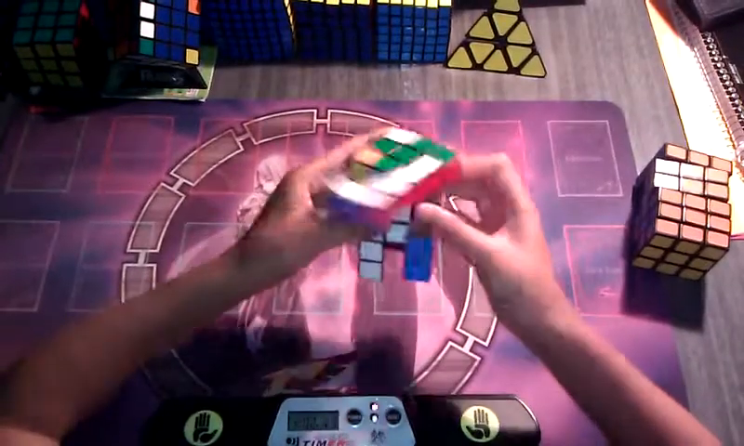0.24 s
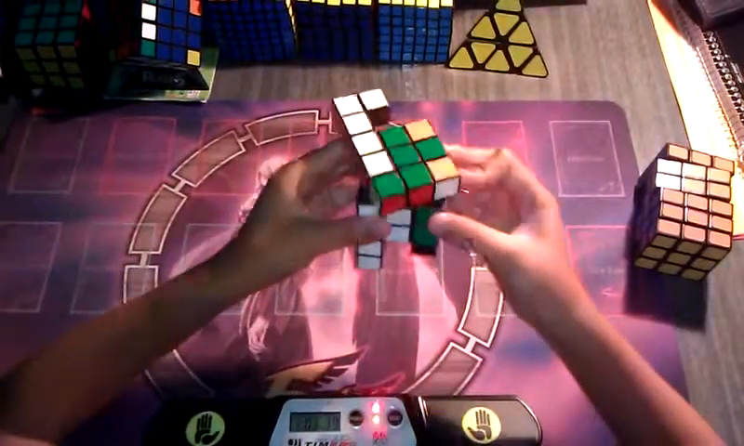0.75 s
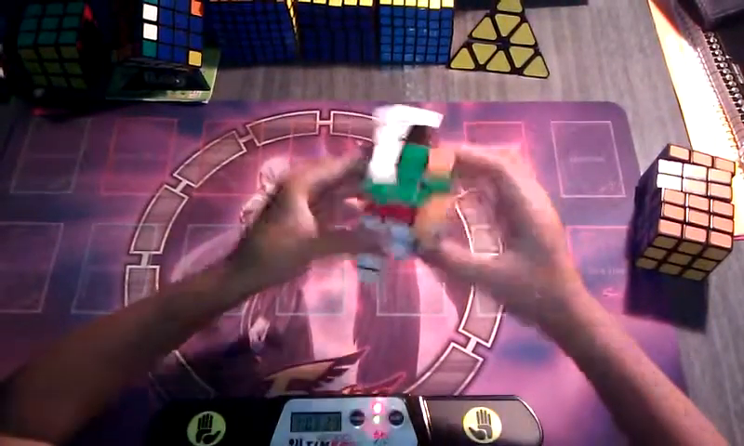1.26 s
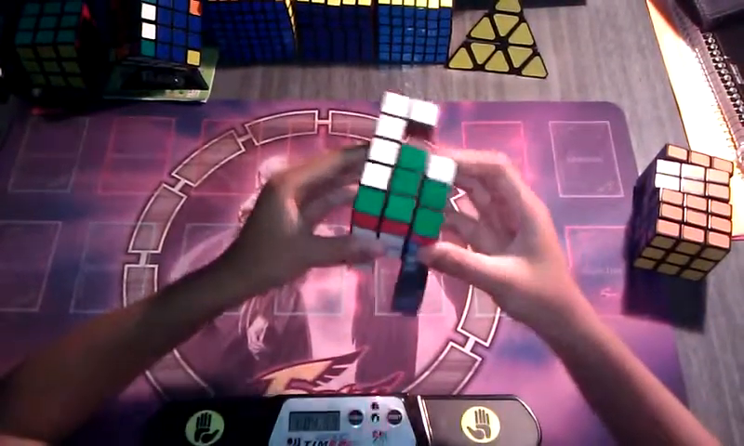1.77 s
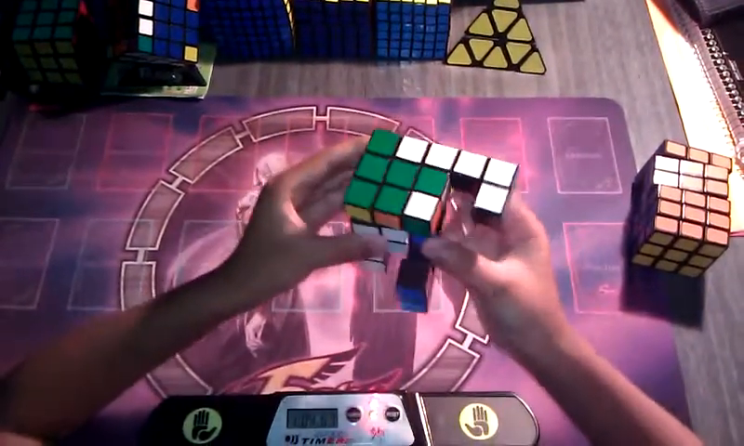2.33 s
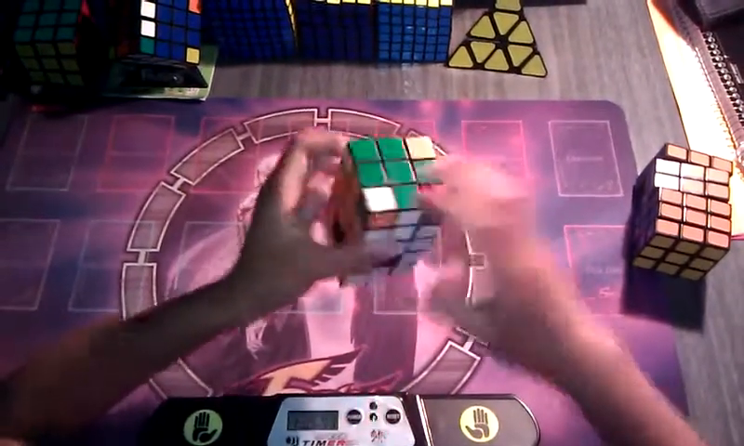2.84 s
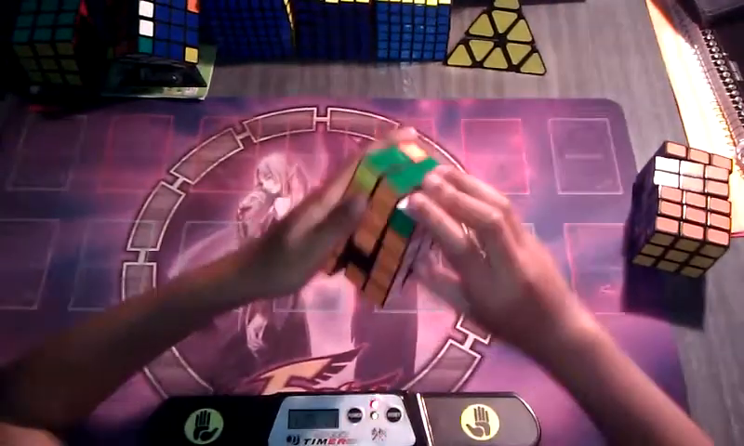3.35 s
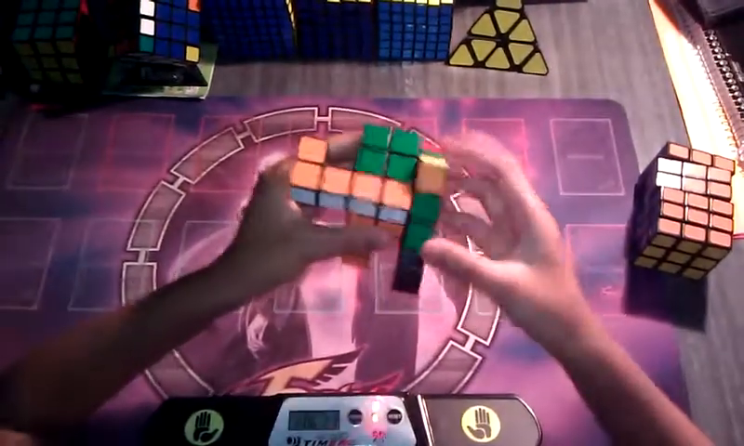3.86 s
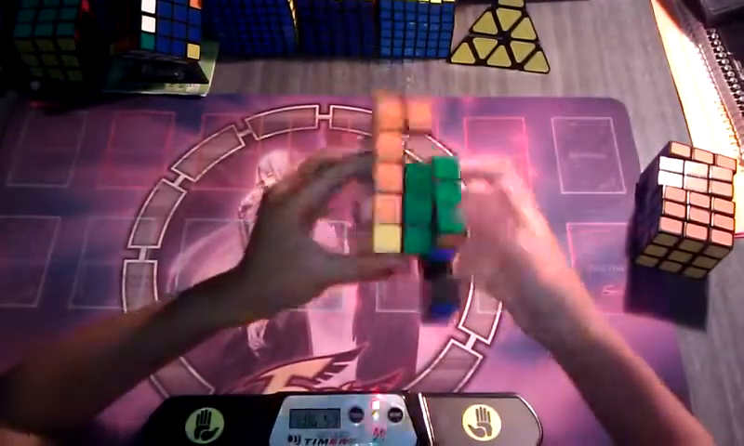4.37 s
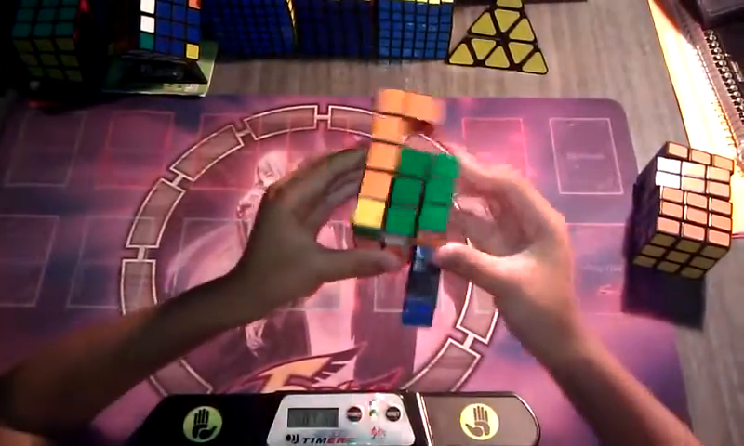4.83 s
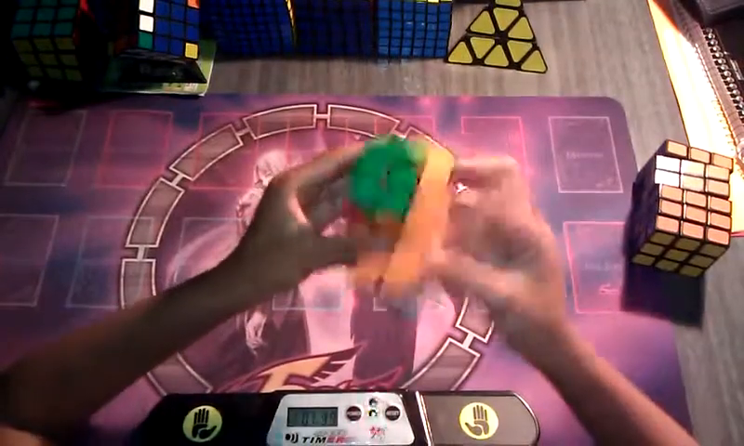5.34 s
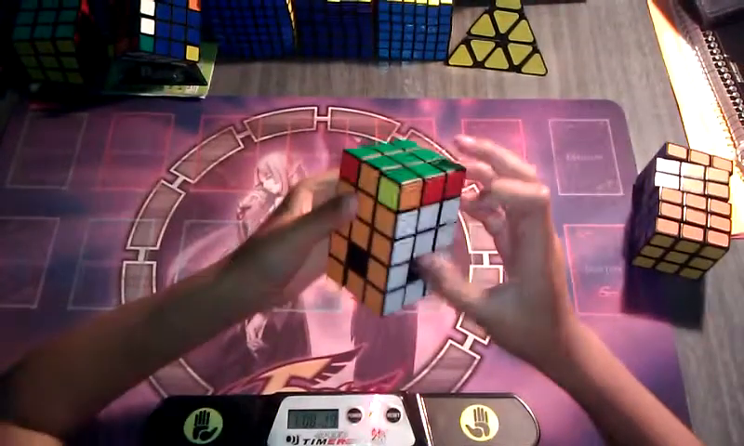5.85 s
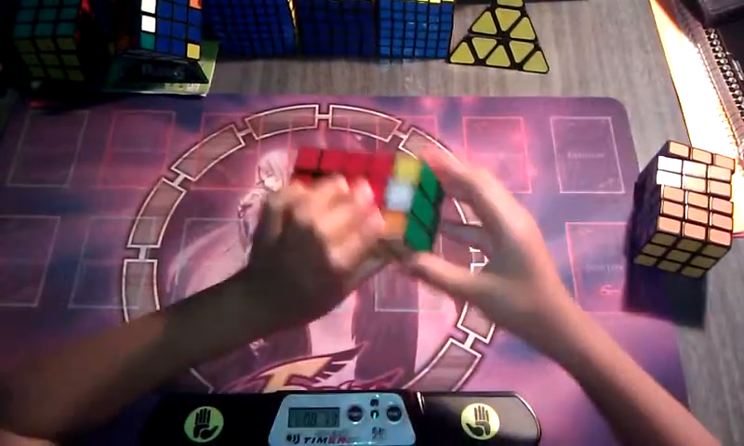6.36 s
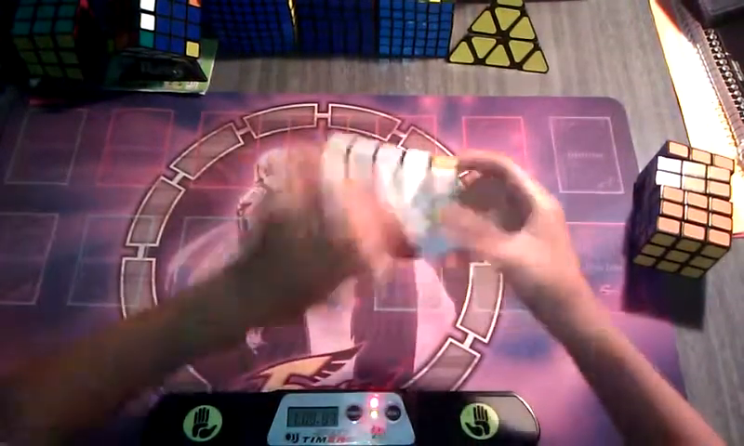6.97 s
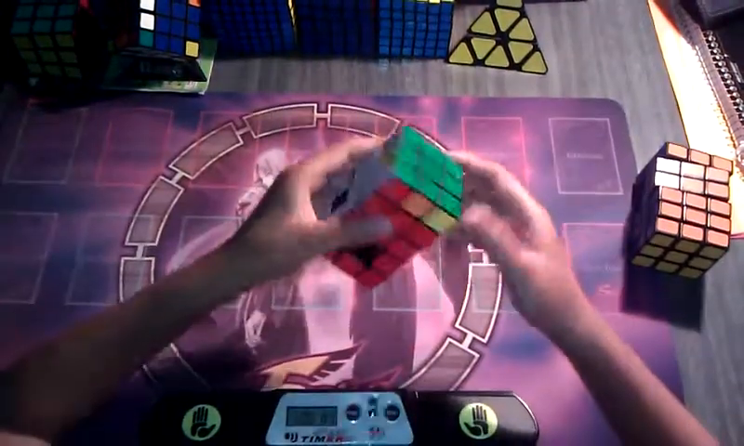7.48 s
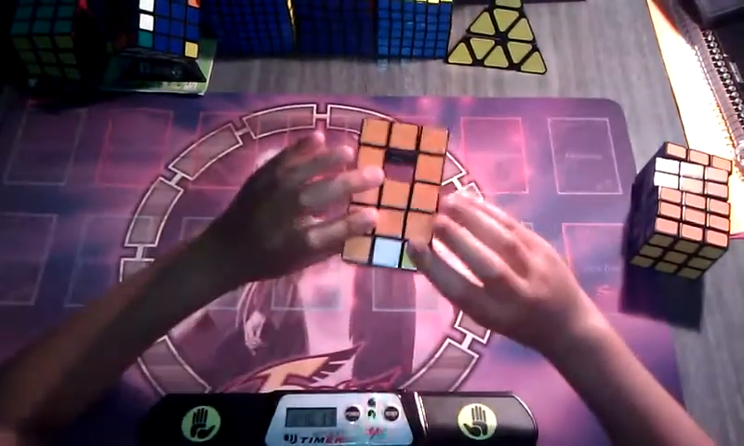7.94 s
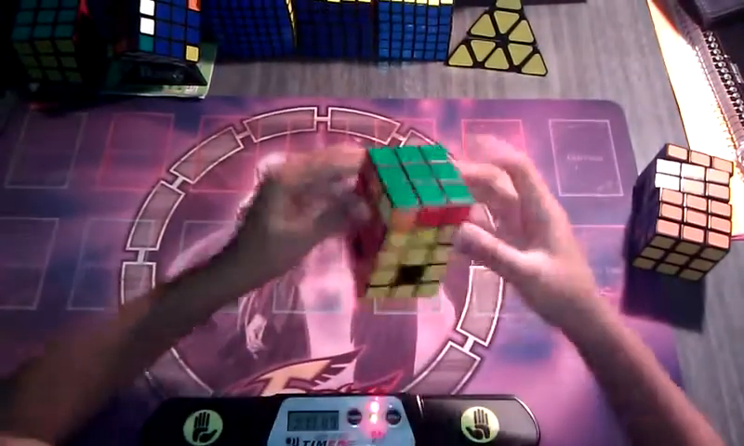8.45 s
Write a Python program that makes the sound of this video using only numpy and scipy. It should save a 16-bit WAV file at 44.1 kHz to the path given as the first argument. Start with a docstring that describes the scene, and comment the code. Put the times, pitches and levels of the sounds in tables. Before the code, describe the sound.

In a small quiet room with a faint, even rush of air, a hollow plastic twisty puzzle is worked by hand close to a narrow-band microphone. A dense flurry of bright clacks and rattling turns opens immediately and lasts to about 0.4 s. Lighter clicks follow, with a firm burst at 1.25-1.4 s, then faint grip ticks. Sharp snaps come at 2.2 and 2.5 s, a knock at 3.3, and a very hard double clack near 3.6. More quick turns fall around 4.2-4.3, 4.9 and 5.25-5.4 s, the hardest crackling with overload. Then it is nearly quiet, with only tiny ticks, until one rattling burst at 6.9-7.0 s. A very faint, brief low hum swells near 7.5 s, and sparse light knocks, slightly clearer at 8.15 and 8.5, continue to the end at about 8.7 s. Short room reflections surround the clacks.

```python
"""A plastic twisty puzzle is turned fast by hand over a desk, in a small quiet room.
Bursts of clacks and rattling turns open at once and return until about 5.5 s, with faint grip ticks between.
Then it thins out: one more burst near 6.9 s, a brief faint hum near 7.5 s, light knocks to the end.
Knocks are shaped noise plus shell modes; turns are cascades of ringing ticks over a rub.
The narrow-band microphone is close, and the hardest turns overload it into crackle."""
import sys
import numpy as np
from scipy import signal
from scipy.fft import rfft, irfft
from scipy.io import wavfile
from scipy.ndimage import uniform_filter1d

SR = 44100
rng = np.random.default_rng(int(sys.argv[2]) if len(sys.argv) > 2 else 0)


def wav_out(sig):
    """Save sig, one row per channel (or a flat mono array), as 16-bit PCM at SR to the path in sys.argv[1]."""
    wavfile.write(sys.argv[1], SR, np.round(np.clip(np.atleast_2d(sig).T, -1, 1) * 32767).astype(np.int16))


N = 384111

# steady room noise spectrum: (frequency [Hz], relative density [dB per Hz])
AIR_SPECTRUM = [(25, -43.5), (60, -32), (130, -22.5), (190, -11.5), (245, -6.5), (340, -3), (480, -5.5),
                (800, -9), (1300, -12), (4000, -17), (5600, -24.5), (7600, -18), (8600, -27.5),
                (9400, -68.5)]
AIR_RMS_DB = -59
# decay of the diffuse room tail: (frequency [Hz], t60 [s])
ROOM_DECAY = [(800, 0.2761), (3500, 0.23), (7500, 0.1841)]
# starting colour of that tail: (frequency [Hz], relative level [dB])
ROOM_TONE = [(500, 1), (1200, 1), (3500, 1), (6500, -0.91)]
# early echoes from near surfaces: (delay [s], level [dB])
NEAR_ECHOES = [(.0023, -7.5), (.0047, -9), (.011, -17), (0.0392, -46)]
# microphone response after its overloaded input: (frequency [Hz], gain [dB])
MIC_RESPONSE = [(20, -3), (100, -1.5), (700, -1), (8200, -2.5), (15500, -1.5)]
BAND_HZ, EDGE_HZ = 8800, 16000  # band limit before the crackle joins, and the final one
# lasting modes of the whole puzzle: (frequency [Hz], level [dB], t60 [s])
BODY_MODES = [(985, -54, 0.23), (1080, -55, 0.041), (1830, -68, 0.017), (2640, -60.5, 0.012)]
# fingers shift their grip and loose pieces tick: (start [s], end [s], relative level [dB])
GRIP_CHANGES = [(.4, .56, -45), (.74, 1.2, -43), (1.5, 2.05, -43.5), (2.25, 2.4, -43), (3.1, 3.25, -47),
                (4.45, 4.85, -40), (5.03, 5.14, -43), (5.93, 6.08, -52), (6.55, 6.66, -42),
                (6.74, 6.87, -47), (7.05, 7.3, -49), (8.4, 8.7, -49)]
GRIP_SPREAD_DB, GRIP_DB_PER_OCTAVE = 3.5, -3
# colour of the knocks and turns, including the recorder's band limit:
# (frequency [Hz], relative level [dB])
CONTACT_TONE = [(100, -43.5), (400, -21), (650, -17.5), (950, -4), (1600, 1), (2500, 0.5), (3500, -2.5),
                (5600, -2), (6600, 6.5), (7700, 3.5), (8300, -7), (8800, -23), (9500, -49), (11000, -57)]
# a layer slides or is flicked round:
# (start [s], length [s], relative level [dB], brightness [dB per octave])
LAYER_TURNS = [ (0.053, 0.0092, -28, -1.5), (0.096, 0.06, -13.5, 0.5), (0.248, 0.11, -23, -1),
               (0.587, 0.079, -44, -4.5), (0.696, 0.011, -29.5, -2.5), (0.881, 0.052, -38.5, -4),
               (1.094, 0.028, -40.5, -4), (1.2, 0.09, -28.5, -1.5), (1.339, 0.051, -16.5, -1.5),
               (1.674, 0.017, -42.5, -4.5), (2.051, 0.045, -35.5, -5), (2.182, 0.023, -16, 0),
               (2.51, 0.035, -14.5, 2), (2.588, .07, -31.5, 1.5), (3.262, .06, -41.5, -3),
               (3.43, 0.12, -29.5, -3), (3.607, 0.055, -8.5, 1.5), (4.088, 0.053, -39, -2.5),
               (4.167, 0.035, -17.5, 0), (4.286, 0.036, -23.5, 0), (4.462, 0.062, -46.5, -1.5),
               (4.737, 0.11, -45, -3.5), (4.857, 0.031, -20, -1.5), (5.202, 0.0072, -43.5, -4.5),
               (5.253, 0.046, -14, 3), (6.57, 0.072, -44.5, -2.5), (6.883, 0.11, -23, 0.5),
               (7.253, 0.02, -44.5, -2), (7.672, 0.015, -51, -3), (8.289, 0.015, -36.5, -1.5)]
# every turn: a soft lead-in that grows, the clatter at full speed, then a quick run-out
LEAD_S, LEAD_DB, LEAD_GROWTH_DB_PER_S = 0.021, -12.5, 253.5
SAG_DB, RUN_OUT_S, RUN_OUT_DB_PER_S = -2, 0.035, 800.5
# knocks that stand out, one piece on another:
# (time [s], relative level [dB], brightness [dB per octave])
PIECE_KNOCKS = [ (.0353, -31, -1.5), (.061, -8.5, -1), (.0665, -19, -2), (.0926, -16, 7.5), (.1025, -7, 2),
                (.1167, -1, 7.5), (.1445, -7, -2.5), (.199, -20, 0.5), (.251, -11, 4), (.286, -12, 2.5),
                (.3234, -15, 10), (.3443, -10, 0), (.3927, -27, -2.5), (.4729, -34, -4), (.5924, -23.5, 4),
                (.6001, -21.5, -4.5), (.6331, -25.5, -6), (.6512, -21, -4.5), (.681, -34, 1),
                (.703, -14.5, 3), (.716, -17.5, 5), (.8198, -25, 1), (.8861, -23, 3.5),
                (.9227, -16.5, -1.5), (1.0846, -28, 1.5), (1.1217, -17, -1.5), (1.2119, -32, -7),
                (1.2528, -7, 1), (1.2745, -18, 3), (1.3318, -6.5, -2), (1.3451, -10.5, 3), (1.368, -3.5, 4),
                (1.3787, -10.5, 2), (1.4675, -26.5, -2.5), (1.617, -36.5, -3), (1.6508, -33, -2),
                (1.6962, -28.5, -3.5), (1.782, -35, -2.5), (1.837, -35, 4), (1.896, -31, -4.5),
                (1.9138, -26.5, 1), (1.992, -36.5, 3.5), (2.0757, -14.5, -1), (2.1035, -22.5, -1.5),
                (2.1646, -14.5, 5), (2.2148, -6.5, -0.5), (2.3222, -31, 0), (2.3834, -26.5, -1),
                (2.4731, -22.5, 0), (2.4997, -14.5, -0.5), (2.5194, -11, 0.5), (2.5365, 6, 1.5),
                (2.5908, -10.5, 0.5), (2.6186, -10.5, -3.5), (2.6497, -20, 0), (3.0283, -22, 5),
                (3.1163, -39.5, 1), (3.1546, -35.5, -1), (3.2256, -30, 1), (3.2734, -28.5, -3.5),
                (3.2926, -21.5, 0), (3.3271, -1.5, 2.5), (3.4512, -17, 1.5), (3.4818, -13.5, 1),
                (3.5157, -19.5, -3), (3.6108, -2.5, -13), (3.6182, 2.5, 5.5), (3.6429, 6.5, 6.5),
                (3.7512, -27, 4), (4.0536, -29.5, 2), (4.0718, -27, 0), (4.1029, -25, -3),
                (4.1565, -25.5, -4.5), (4.1753, -8.5, -4), (4.2047, -4.5, 6.5), (4.2925, -2, 0.5),
                (4.3244, -13.5, -2), (4.4826, -29.5, -4), (4.5795, -29, 4.5), (4.6139, -28.5, 3.5),
                (4.7599, -31, -8), (4.7901, -22.5, 0), (4.8579, -18.5, -3), (4.8735, 1.5, 3),
                (4.9114, -7.5, 2), (4.9926, -20.5, 10), (5.0366, -33, 2.5), (5.1064, -38.5, -5),
                (5.1335, -40, -5.5), (5.2015, -23, -0.5), (5.239, -9, 1.5), (5.2702, 5.5, 3.5),
                (5.2924, 0, -0.5), (5.3089, -4.5, 0.5), (5.3472, -20, 0), (5.3909, -6, 1.5),
                (5.4594, -22.5, 2.5), (5.756, -42, -2.5), (5.9717, -42, -5), (6.02, -44, -5),
                (6.3868, -33.5, 2), (6.5979, -27, 0), (6.628, -35.5, 8), (6.8358, -34.5, -3),
                (6.8958, -5.5, 0), (6.9167, -13, -0.5), (6.9292, -9.5, 3.5), (6.9706, -10, 2),
                (6.9848, -17, 0.5), (7.0549, -22.5, -3), (7.2488, -39.5, -5), (7.44, -43, -1.5),
                (7.566, -35, -5), (7.6746, -36, 0), (7.6905, -36.5, -3.5), (7.7595, -39.5, -12.5),
                (7.796, -36, -4.5), (8.0783, -34, -1.5), (8.1479, -21.5, -1), (8.2963, -33.5, 4),
                (8.3097, -33, -2), (8.4336, -37.5, -6), (8.4808, -20, 1), (8.6372, -28.5, -1.5),
                (8.646, -33, -3), (8.7004, -28, -1.5)]
# short modes of a hollow piece, before each piece's own variation:
# (frequency [Hz], relative level [dB])
SHELL_MODES = [(1180, -10.5), (1700, -2.5), (2380, 2), (2900, -6), (3850, -4), (4700, 2), (6200, -1.5),
               (6950, -1.5), (7550, 2.5)]
# a piece grazes its neighbour just before it lands (rise time constant), then its shell rings
GRAZE_S, RING_T60_S = .003, .013


def amp(db):
    """Decibels to gain."""
    return 10 ** (np.asarray(db) / 20)


def unit(x):
    """Scales to energy 1."""
    return x / np.sqrt(np.sum(x ** 2) + 1e-20)


def read(points, hz):
    """Reads a table on a log-frequency axis."""
    f, value = np.transpose(points)
    return np.interp(np.log(hz + 1), np.log(f + 1), value)


def add(mix, s, sound):
    """Mixes a sound in at time s."""
    part = mix[max(round(s * SR), 0):][:len(sound)]
    part += sound[:len(part)]


def causal(points, size=4096):
    """Minimum-phase impulse response of a spectrum."""
    log_gain = np.log(amp(read(points, abs(np.fft.fftfreq(size, 1 / SR)))))
    return np.fft.ifft(np.exp(np.conj(signal.hilbert(log_gain)))).real[:size // 2]


def low_pass(x, hz, size=255):
    """Steep band limit."""
    taps = signal.firwin(size, hz, window="blackmanharris", fs=SR)
    return signal.oaconvolve(x, taps, "same")


def tilt(db_per_octave, size):
    """Gain for each frequency, pivoting at 3500 Hz: harder contacts are brighter."""
    hz = np.clip(np.fft.rfftfreq(size, 1 / SR), 1200, 8000)
    return amp(db_per_octave * np.log2(hz / 3500))


def air():
    """The low, even rush of the room with a little hiss: noise shaped by a fixed spectrum."""
    gain = amp(read(AIR_SPECTRUM, np.fft.rfftfreq(N, 1 / SR)))
    noise = irfft(rfft(rng.standard_normal(N)) * gain, N)
    return amp(AIR_RMS_DB) * np.sqrt(N) * unit(noise)


def hum(width_s=0.067, peak_db=-67):
    """A faint low hum swells once and fades: a sine under a bell-shaped envelope."""
    t, hz = np.arange(N) / SR - 7.49, 110
    return amp(peak_db) * np.exp(-(t / width_s) ** 2) * np.sin(2 * np.pi * hz * t)


def room(x, wet_db=-12.5, build_s=0.0041, count=3):
    """Echoes of the desk and walls, then several diffuse noise tails that slowly fade in and out in turn."""
    near = np.zeros(SR // 10)
    for delay, db in NEAR_ECHOES:
        add(near, delay, amp([db]))
    out = signal.oaconvolve(x, near)[:N]
    for k in range(count):
        hz, t, grid = signal.stft(rng.standard_normal(SR // 2), SR, nperseg=256)
        decay_db = -60 * t / read(ROOM_DECAY, hz)[:, None]
        grid = grid * amp(read(ROOM_TONE, hz)[:, None] + decay_db)
        tail = signal.istft(grid, SR, nperseg=256)[1]
        build_up = 1 - np.exp(-np.arange(len(tail)) / SR / build_s)
        tail = unit(tail * build_up)
        # each tail's send fades in and out, staggered against the others
        share = np.sqrt(2 / count) * np.cos(np.pi * (np.arange(N) / SR + k / count))
        out = out + amp(wet_db) * signal.oaconvolve(x * share, tail)[:N]
    return out


def body(x, size=8192):
    """Every contact also rings the whole puzzle a little, through a few decaying modes."""
    t = np.arange(size) / SR
    ring = sum(amp(db - 60 * t / t60) * np.cos(2 * np.pi * hz * t) for hz, db, t60 in BODY_MODES)
    return x + signal.oaconvolve(x, ring)[:N]


def grip_ticks(count=96):
    """Faint knocks scattered over the changes of grip, listed like PIECE_KNOCKS."""
    start, end, db = np.transpose(GRIP_CHANGES)
    # lay the grip changes end to end, scatter the ticks, then map them back to scene time
    elapsed = np.cumsum(end - start)
    moments = elapsed[-1] * (np.arange(count) + rng.random(count)) / count
    grip = np.searchsorted(elapsed, moments)
    times = end[grip] - elapsed[grip] + moments
    levels = db[grip] + GRIP_SPREAD_DB * rng.standard_normal(count)
    return [(s, level, GRIP_DB_PER_OCTAVE) for s, level in zip(times, levels)]


def turn_shape(length):
    """Gain through one turn: lead-in, a slightly sagging hold, run-out."""
    t = np.arange(-LEAD_S, length + RUN_OUT_S, 1 / SR)
    hold = SAG_DB * (t / length - .5) - RUN_OUT_DB_PER_S * np.maximum(t - length, 0)
    return amp(np.where(t < 0, LEAD_DB + LEAD_GROWTH_DB_PER_S * t, hold))


def rattle(level_db=-3.0, ticks_per_s=330, spread_db=4, tick_s=0.00097, rub_db=-19, ring_db=-3,
           low_hz=1250, high_hz=7500, size=384):
    """Edges catch in a quick cascade of ticks over a faint rub; each catch rings a different piece."""
    is_catch = rng.random(N) < ticks_per_s / SR
    catches = is_catch * amp(spread_db * np.minimum(rng.exponential(1, N), 3))
    force = np.convolve(catches, np.exp(-np.arange(size) / SR / tick_s))[:N]
    # the ring jumps to a new random pitch at every catch
    piece_hz = low_hz * (high_hz / low_hz) ** rng.random(N)[np.cumsum(catches > 0)]
    ring = amp(ring_db) * np.sin(2 * np.pi * np.cumsum(piece_hz) / SR)
    ticks = (force + amp(rub_db)) * rng.standard_normal(N) + force * ring
    out = np.zeros(N)
    for start, length, db, bright in LAYER_TURNS:
        shape = turn_shape(length)
        first = max(round((start - LEAD_S) * SR), 0)
        stroke = unit(shape * ticks[first:][:len(shape)])
        stroke = irfft(rfft(stroke) * tilt(bright, len(stroke)), len(stroke))
        add(out, start - LEAD_S, amp(level_db + db) * np.linalg.norm(shape) * stroke)
    return signal.oaconvolve(out, unit(causal(CONTACT_TONE)))[:N]


def knocks(hits, level_db=18, contact_s=0.00076, contact_spread=0.15, chatter_s=0.0054, chatter_db=-15,
           graze_db=-24, ring_db=-5, mode_spread_db=7, detune=.07, settle_s=.07, settle_db=-21, size=2048):
    """Each knock is a graze, a rough contact, a chatter of loose pieces and the ring of one hollow shell."""
    t = (np.arange(size) - size // 4) / SR  # 0 is the moment of landing
    graze = amp(graze_db) * np.exp(-abs(t) / GRAZE_S)
    chatter = amp(chatter_db) * np.exp(-abs(t) / chatter_s)
    ring_decay = (t >= 0) * amp(-60 * abs(t) / RING_T60_S)
    tone = rfft(causal(CONTACT_TONE)[:size])
    mode_hz, mode_db = np.transpose(SHELL_MODES)
    grits = rng.standard_normal((len(hits), size))
    waits = rng.random(len(hits))
    pieces = rng.standard_normal((len(hits), 2, len(SHELL_MODES)))  # no two pieces ring quite alike
    out = np.zeros(N)
    for (s, db, bright), grit, wait, (strength, mistuning) in zip(hits, grits, waits, pieces):
        colour = tilt(bright, size) * tone
        lasts = contact_s * np.exp(-contact_spread * np.tanh(bright / 2))  # bright knocks are hard and short
        envelope = np.where(t < 0, graze, np.exp(-abs(t) / lasts) + chatter)
        contact = unit(irfft(rfft(grit * envelope) * colour))
        waves = np.sin(2 * np.pi * np.outer(mode_hz * (1 + detune * mistuning), t))
        modes = amp(mode_db + mode_spread_db * strength) @ waves
        ring = unit(irfft(rfft(modes * ring_decay) * colour))
        add(out, s + t[0], amp(db + level_db) * unit(contact + amp(ring_db) * ring))
        # the piece settles a moment later
        add(out, s + wait * settle_s, amp(db + level_db + settle_db) * contact)
    return out


def scene():
    """The knocks radiate with one grain toward the microphone and with another into the room."""
    sliding = rattle()
    hits = list(PIECE_KNOCKS) + grip_ticks()
    direct = body(knocks(hits) + sliding)
    outward = body(knocks(hits) + sliding)
    return (direct + room(outward) + air() + hum())[None]


def record(dry, limit_db=-18.0, squeeze=0.84, overload_db=-16, knee_db=5, crackle_db=-29,
           ceiling_db=-5, size=280):
    """A fast limiter holds loud clatter down; a sustained overload breaks into broadband crackle."""
    power_db = 10 * np.log10(abs(uniform_filter1d(dry[0] ** 2, size)) + 1e-12)
    cut_db = squeeze * uniform_filter1d(np.maximum(power_db - limit_db, 0), size)
    ceiling = amp(ceiling_db)
    held = np.clip(dry[0] * amp(-cut_db), -ceiling, ceiling)
    overload = uniform_filter1d(np.clip((power_db - overload_db) / knee_db, 0, 1), size)
    crests = abs(held) / amp(limit_db)  # the crackle sits on the crests of the wave
    crackle = amp(crackle_db) * overload * crests * rng.standard_normal(N)
    coloured = signal.oaconvolve(low_pass(held, BAND_HZ) + crackle, causal(MIC_RESPONSE))[:N]
    return low_pass(coloured, EDGE_HZ)[None]


dry = scene()
out = record(dry)
wav_out(out)
```